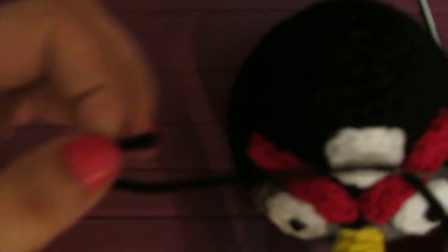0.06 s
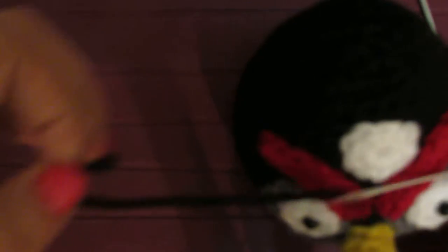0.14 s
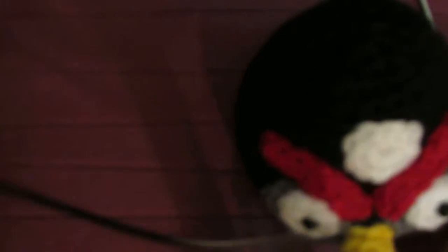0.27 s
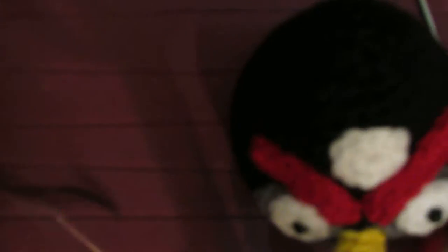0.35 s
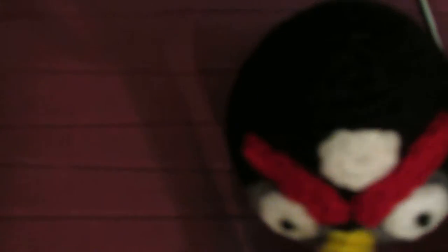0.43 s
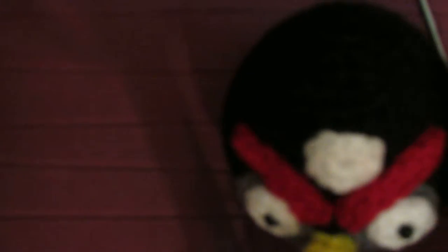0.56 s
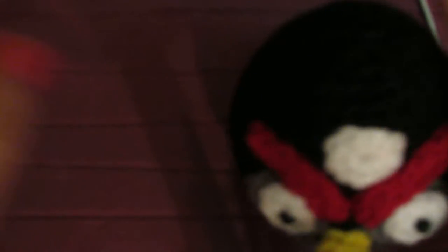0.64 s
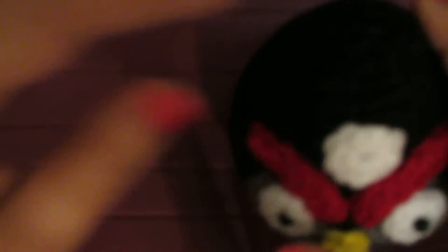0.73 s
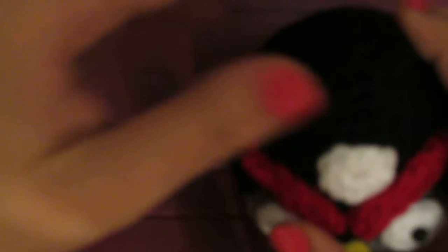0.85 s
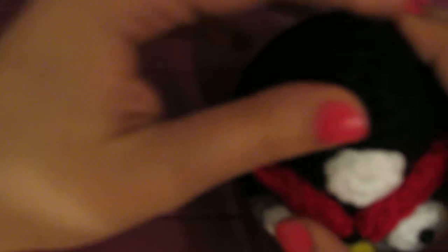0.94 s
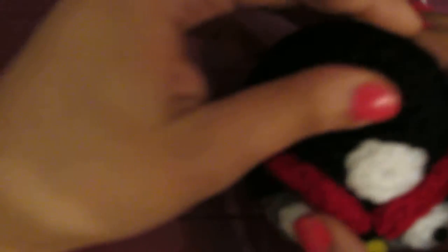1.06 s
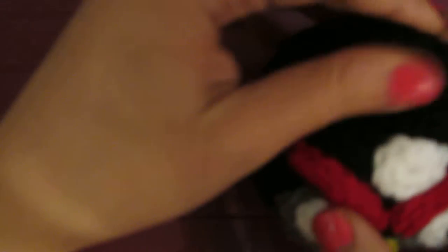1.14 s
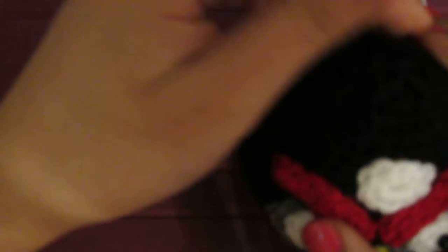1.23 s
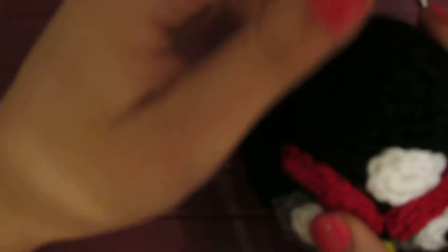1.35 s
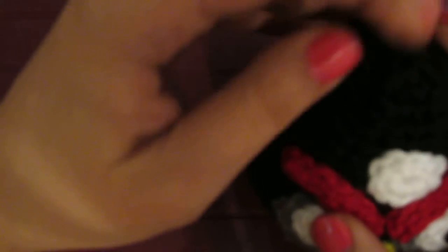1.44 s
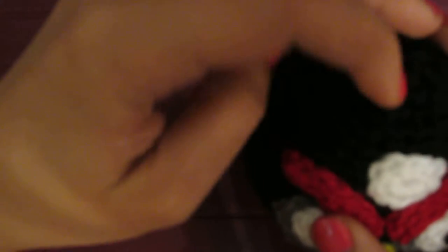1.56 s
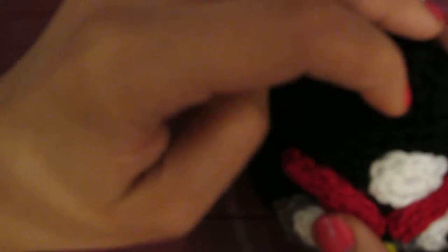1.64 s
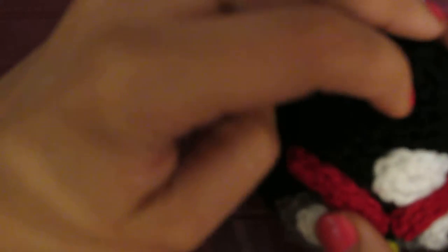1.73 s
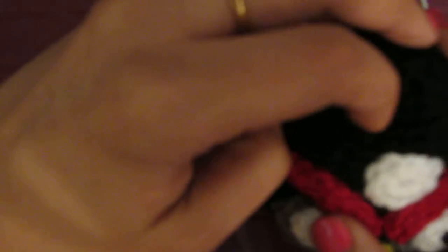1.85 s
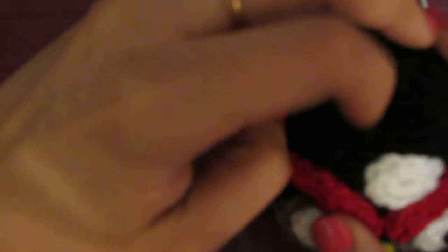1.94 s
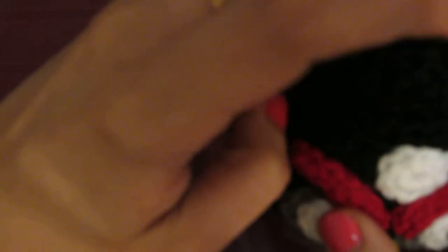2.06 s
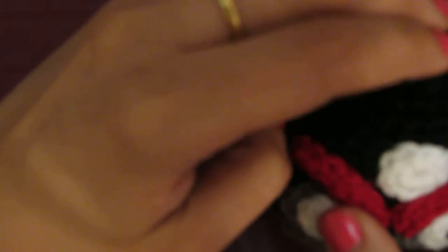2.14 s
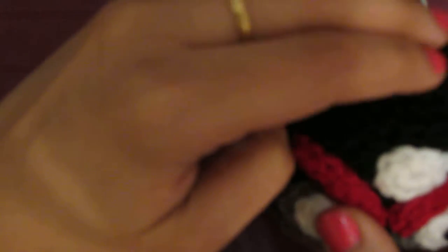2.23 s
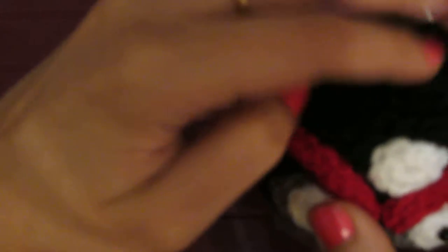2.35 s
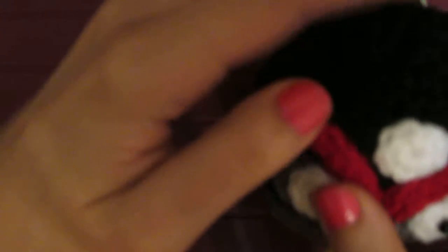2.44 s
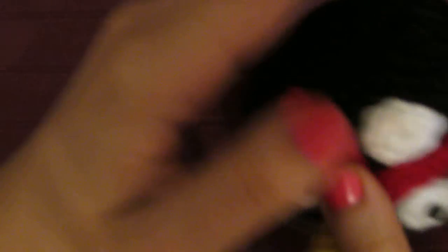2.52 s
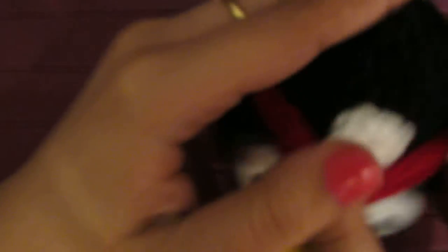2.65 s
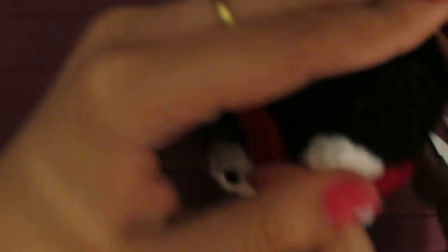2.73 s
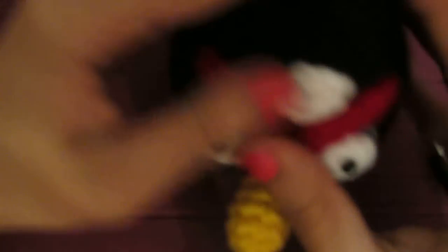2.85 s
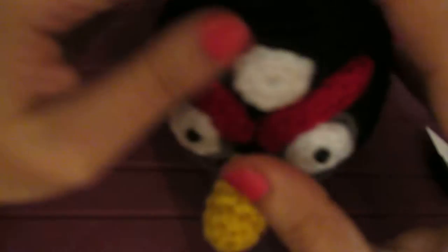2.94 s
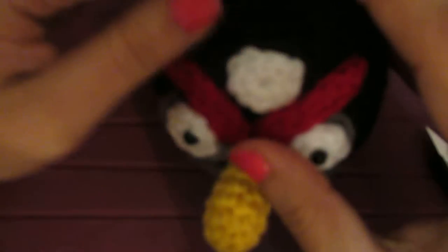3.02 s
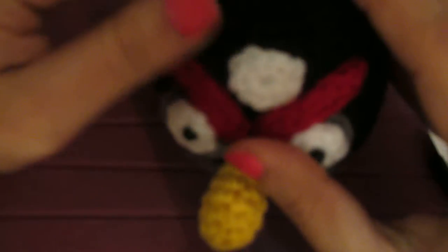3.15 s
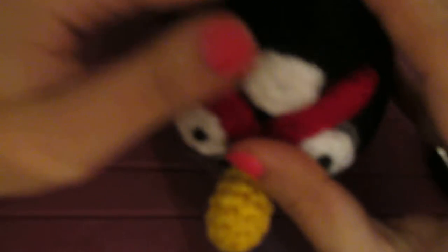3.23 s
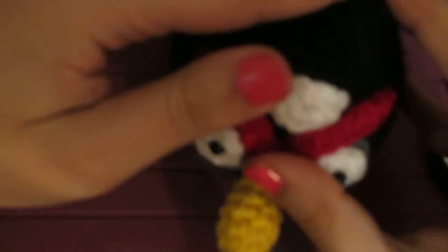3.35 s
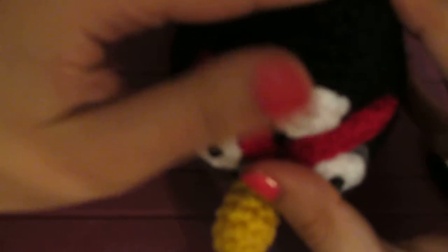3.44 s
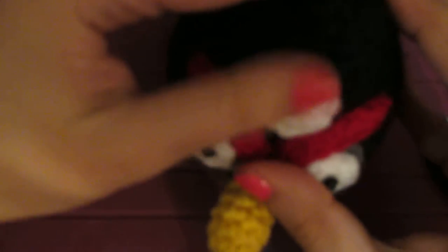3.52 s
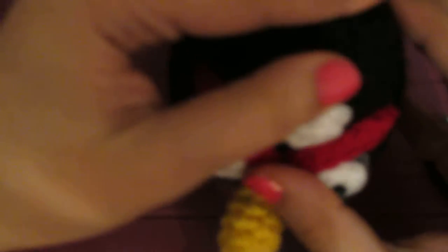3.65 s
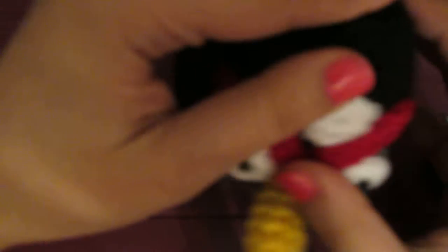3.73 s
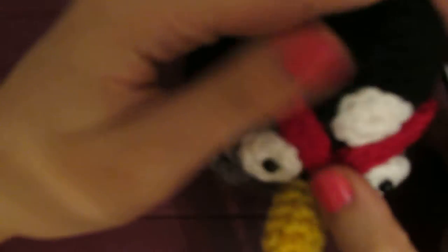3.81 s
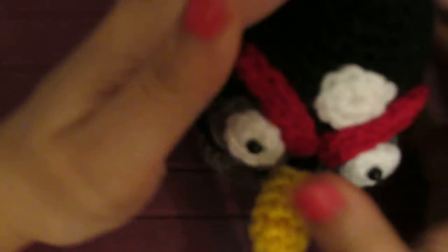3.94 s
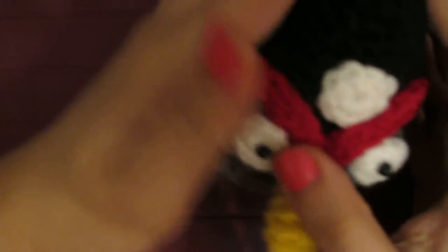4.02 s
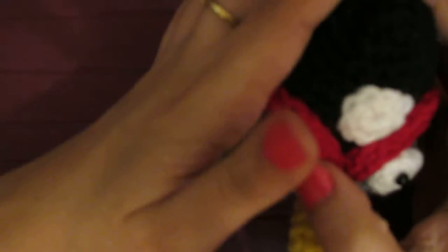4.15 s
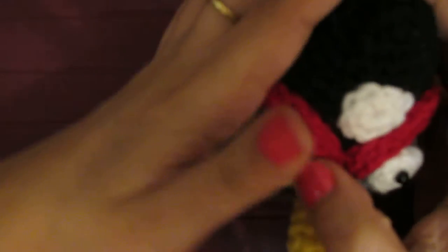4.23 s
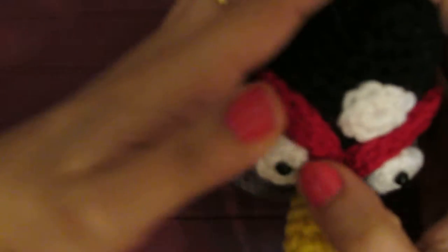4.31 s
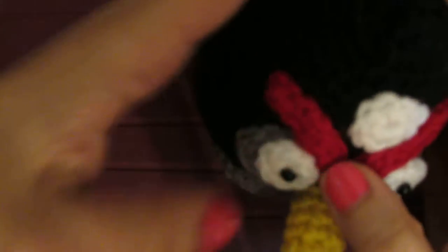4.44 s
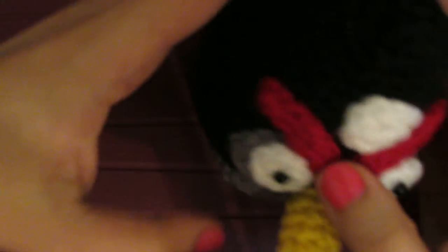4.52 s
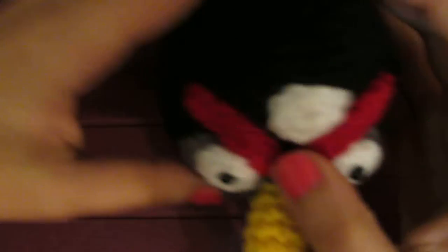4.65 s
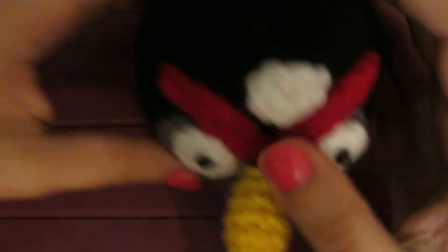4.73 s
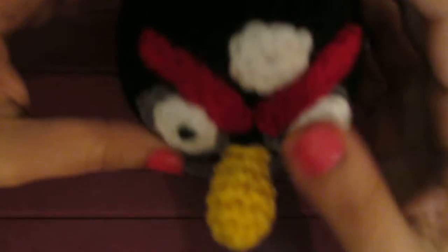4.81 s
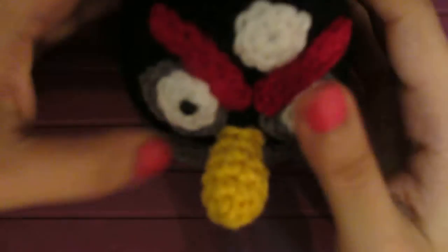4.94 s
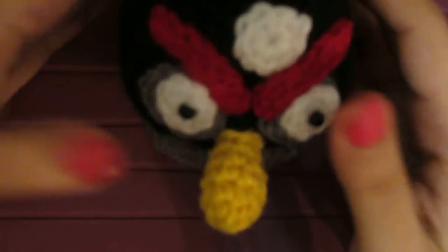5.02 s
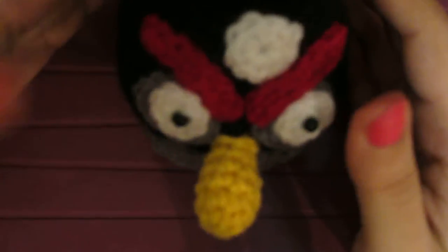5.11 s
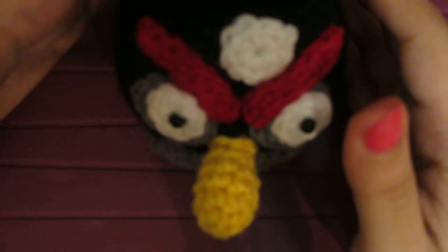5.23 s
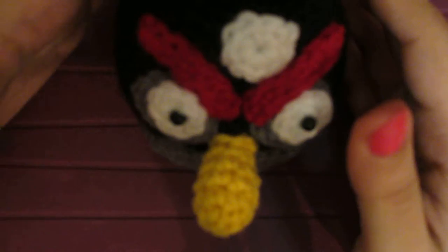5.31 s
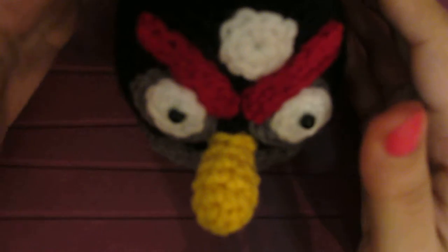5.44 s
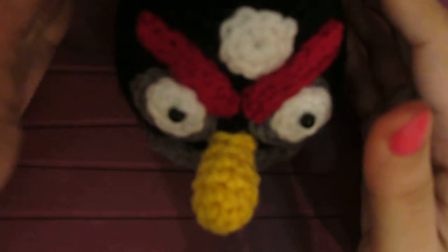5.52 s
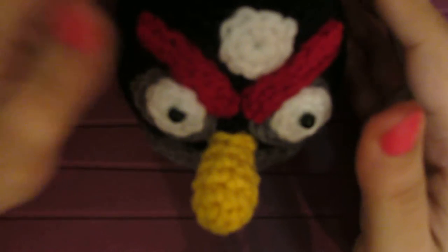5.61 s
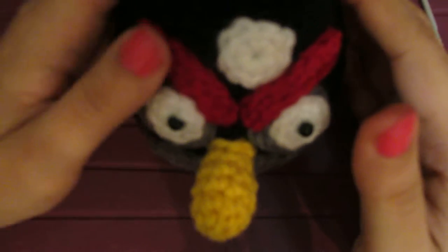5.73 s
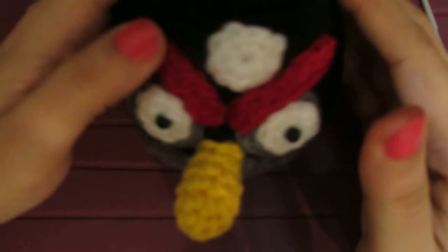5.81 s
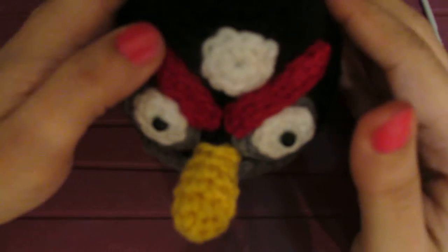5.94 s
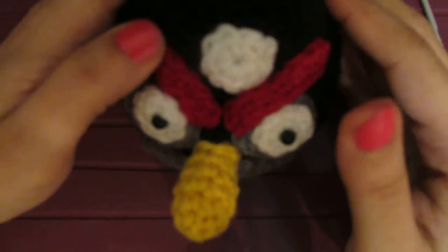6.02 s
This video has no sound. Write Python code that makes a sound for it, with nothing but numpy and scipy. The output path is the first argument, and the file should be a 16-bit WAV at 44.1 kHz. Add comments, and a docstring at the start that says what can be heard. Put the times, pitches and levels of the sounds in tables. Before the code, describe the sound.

Small steel scissors cut a strand of yarn with one sharp snip, very close to the microphone. They are set down on a table at once with several quick, light clinks, soft knocks and a brief ring. Then fingers rub and turn a crocheted toy with a faint, scratchy rustle, and a fingernail ticks once. A fan hums steadily in the small room, swelling slightly after the snip.

```python
"""Scissors and yarn in a small room

Close to a camera's stereo microphone, small steel scissors snip a strand of yarn, then are laid on
the table with a few clinks. Fingers rub and turn a crocheted toy while a fan hums in the room.
The snip drives the camera's gain control down, so the hum creeps back over two seconds."""
import sys
import numpy as np
from scipy import signal
from scipy.fft import rfft, irfft, next_fast_len
from scipy.io import wavfile
from scipy.ndimage import uniform_filter1d, map_coordinates

SR = 44100
rng = np.random.default_rng(int(sys.argv[2]) if len(sys.argv) > 2 else 0)


def store_wav(level_fs):
    """Save 16-bit WAV to argv[1]."""
    pcm = np.round(np.clip(np.atleast_2d(level_fs), -1, 1) * 32767)
    wavfile.write(sys.argv[1], SR, pcm.T.astype(np.int16))


N = 267775
TIME = np.arange(N) / SR
RING_TIME = np.arange(SR // 3) / SR


def amp(db):
    return 10 ** (np.asarray(db) / 20)


def unit_rms(x):
    return x / np.sqrt(np.mean(x ** 2) + 1e-20)


def along(points, hz):
    """Interpolate (f/Hz, value) points on a log frequency axis."""
    f, values = np.transpose(points)
    return np.interp(np.log(hz + 1), np.log(f + 1), values)


def tilted(points, slope_db, knee_hz=1200):
    """A spectrum tilted above a knee by slope_db per octave."""
    return [(hz, db + slope_db * np.log2(max(hz / knee_hz, 1))) for hz, db in points]


def favouring(rows, centre_hz, fall_db):
    """Spectrum points or modes, weakened by fall_db per octave away from a favoured frequency."""
    return [(hz, db - fall_db * abs(np.log2(hz / centre_hz)), *rest) for hz, db, *rest in rows]


def resonant(spectrum, peaks):
    """A spectrum lifted by resonances (f/Hz, width/Hz, level/dB)."""
    f = np.linspace(20, SR / 2, 2048)
    lift = sum(amp(db) ** 2 / (1 + (2 * (f - hz) / width) ** 2) ** 2 for hz, width, db in peaks)
    return np.column_stack([f, along(spectrum, f) + 10 * np.log10(1 + lift)])


def wobble(rate, size=N):
    """A smooth random curve, rate knots a second."""
    knots = rng.standard_normal(int(size * rate / SR) + 4)
    return map_coordinates(knots, [TIME[:size] * rate])


def filtered(x, response):
    """Filter x by a complex response of frequency."""
    size = next_fast_len(x.shape[-1] + 8192)
    hz = np.fft.rfftfreq(size, 1 / SR)
    return irfft(rfft(x, size) * response(hz), size)[..., :x.shape[-1]]


def struck(x, spectrum, size=2048):
    """Causal colouring: nothing sounds before the blow."""
    gain = amp(along(spectrum, np.fft.rfftfreq(size, 1 / SR)))
    cepstrum = irfft(np.log(gain))
    cepstrum[1:size // 2] *= 2
    cepstrum[size // 2 + 1:] = 0
    impulse_response = irfft(np.exp(rfft(cepstrum)))
    return signal.fftconvolve(x, impulse_response)[:len(x)]


def add(track, start_s, sound):
    """Mix a sound into a track."""
    part = track[..., max(round(start_s * SR), 0):][..., :sound.shape[-1]]
    part += sound[..., :part.shape[-1]]


def crack(spectrum, t60, push_share):
    """One sharp push and a dying rattle of micro-contacts, evened out, then given a spectrum."""
    fade = amp(-60 * RING_TIME / t60)
    rattle = unit_rms(fade * rng.standard_normal(len(fade)))
    push = unit_rms(RING_TIME == 0)
    force = np.sqrt(1 - push_share) * rattle + np.sqrt(push_share) * push
    hz = np.fft.rfftfreq(len(force), 1 / SR)
    power = uniform_filter1d(np.abs(rfft(force)) ** 2, size=100)
    uneven_db = 10 * np.log10(np.abs(power) + 1e-12)
    colour = np.column_stack([hz, along(spectrum, hz) - uneven_db])
    return unit_rms(struck(force, colour)) * np.sqrt(np.mean(fade ** 2))


def blow(spectrum, t60, push_share, scatter_db=-8):
    """A crack at both microphone ports, each with its own scatter off the hands and the table."""
    scatter = amp(scatter_db) * np.array([crack(spectrum, t60, 0) for _ in range(2)])
    return (crack(spectrum, t60, push_share) + scatter) / np.hypot(1, amp(scatter_db))


def ring(modes, scatter_db):
    """Damped modes of alternating sign, at new strengths for every blow; starts at rms 1."""
    hz, db, t60 = np.transpose(modes)[:, :, None]
    signs = (-1) ** np.arange(len(hz))[:, None]
    gain = signs * amp(db + scatter_db * rng.standard_normal(hz.shape))
    partials = gain * amp(-60 * RING_TIME / t60) * np.sin(2 * np.pi * hz * RING_TIME)
    return np.sum(partials, 0) / np.sqrt(np.sum(gain ** 2) / 2)


# likeness of the microphone's left and right ports: f/Hz, correlation
PORT_LIKENESS = [(60, 0.081), (120, 0.76), (240, 0.83), (480, 0.42), (950, 0.44), (1900, 0.044),
                 (3800, 0.3), (7500, 0.14), (15000, 0.046)]

def rush(gain, size=N):
    """Stereo noise of rms 1 shaped by gain(hz), most alike at the two ports in the upper bass."""
    def mid_side_gain(hz):
        angle = np.arccos(np.clip(along(PORT_LIKENESS, hz), 0, 1)) / 2
        return gain(hz) * np.array([np.cos(angle), np.sin(angle)])
    mid, side = filtered(rng.standard_normal((2, size)), mid_side_gain)
    return unit_rms(np.array([mid + side, mid - side]))


# the small room's decay: f/Hz, t60/s
ROOM_DECAY = [(200, 0.32), (1500, 0.27), (4000, 0.3), (8000, 0.28), (15000, 0.2)]

def in_room(x, pan_db, wet_db, lag_us=30, wall_hz=6000, build_s=0.0068):
    """A close sound reaches the right port first, then the room answers; pan_db is left over right."""
    direct = filtered(x, lambda hz: np.exp(np.outer([-1j, 1j], np.pi * hz * lag_us / 10 ** 6)))
    hz, t, noise = signal.stft(rng.standard_normal((2, SR // 3)), SR, nperseg=256)
    fade = amp(-60 * t / along(ROOM_DECAY, hz)[:, None]) * (1 - np.exp(-t / build_s))
    tail = signal.istft(noise * fade, SR)[1]
    dull_tail = filtered(tail / np.linalg.norm(tail[0]), lambda f: 1 / np.sqrt(1 + (f / wall_hz) ** 2))
    answer = signal.fftconvolve(np.atleast_2d(x), dull_tail, axes=1)[:, :x.shape[-1]]
    return direct * amp([[pan_db / 2], [-pan_db / 2]]) + amp(wet_db) * answer


# the fan's drone in the room: f/Hz, width/Hz, level/dB
FAN_DRONE = [(53, 14, -52), (105, 54, -45.5), (133.2, 8.8, -49.5), (173.8, 8.7, -55), (192.2, 17.3, -42.5),
             (220, 23, -48.5), (255.7, 38, -45.5), (314.7, 16, -55), (361.7, 11, -57), (855, 126, -51.5),
             (990, 150, -54.5)]
# spectrum of its moving air: f/Hz, level/dB
FAN_AIR = [(60, -41), (200, -28.5), (320, -4.5), (430, -5), (620, -4), (740, -8), (900, -6.5), (1060, -7),
           (1250, -9.5), (1650, -11), (2000, -13), (3300, -19.5), (4200, -24.5), (7000, -33), (11000, -38),
           (16000, -43.5)]

def fan(hum_hz=58.7, hum_db=-45.5, waver_db=0.5, air_db=-42):
    """Room tone: the motor's clean hum, turbulence in narrow resonances, and the broad rush of air."""
    def resonances(hz):
        return np.sqrt(sum(amp(db) ** 2 / width / (1 + (2 * (hz - centre) / width) ** 2) ** 2
                           for centre, width, db in FAN_DRONE))
    hum_peak = np.sqrt(2) * amp(hum_db + waver_db * wobble(3.3))
    hum = hum_peak * np.sin(2 * np.pi * hum_hz * TIME + 0.11 * wobble(2.5))
    drone = np.linalg.norm([amp(db) for _, _, db in FAN_DRONE]) * rush(resonances)
    air = amp(air_db) * rush(lambda hz: amp(along(FAN_AIR, hz)))
    return hum * amp([[1.6], [-1.6]]) + drone + air


def fibres(spectrum, size, grain_db=2.0):
    """Skin dragging over fibres: a grainy hiss of rms 1."""
    hiss = rush(lambda hz: amp(along(spectrum, hz)), size)
    return unit_rms(hiss * amp(grain_db * wobble(350, size)))


# spectrum of rubbed wool: f/Hz, level/dB
WOOL_TONE = [(800, -27), (2500, 4.5), (5000, -0.5), (7500, -3), (10000, -5.5), (15500, -8)]
# the hands turn the toy: from t/s, to t/s
TURN_SPAN = (2.17, 4.9)
# a finger strokes or catches a fibre: t/s, level/dB, half length/s, favoured f/Hz, fall/(dB/octave)
FINGER_STROKES = [(0.016, -56.5, 0.027, 11000, 9), (1.1, -58.5, 0.16, 10000, 4),
                  (1.203, -44, 0.022, 10500, 6.5), (1.831, -54, 0.013, 10000, 5),
                  (1.892, -43, 0.002, 8500, 12), (1.954, -59, 0.037, 10000, 8),
                  (2.358, -52, .006, 10000, 8), (2.417, -55, .008, 11500, 10),
                  (2.572, -51.5, 0.025, 7000, 4), (2.651, -55, 0.045, 6200, 10),
                  (2.692, -47.5, 0.041, 7200, 9), (2.737, -46.5, 0.019, 5200, 4),
                  (2.77, -55, 0.019, 11000, 9), (2.86, -55, 0.055, 8000, 7), (2.963, -54, .015, 11000, 5),
                  (3.043, -55, .065, 12000, 7), (3.09, -57, 0.12, 5300, 5), (3.267, -57, 0.017, 10500, 14),
                  (3.325, -59, 0.04, 11000, 9), (3.798, -59, 0.15, 10000, 9), (4.121, -58, 0.074, 6500, 8),
                  (4.362, -59, 0.032, 10000, 11), (4.626, -53.5, 0.052, 7300, 13),
                  (4.97, -53.5, 0.072, 9000, 5), (4.984, -53, .003, 10000, 9), (5.024, -52, .003, 10000, 5),
                  (5.827, -58.5, 0.053, 8000, 4), (5.981, -55, 0.049, 6000, 4)]

def wool(hold_db=-70.5, turn_db=-60.5, ease_s=0.12, unsteady_db=1.56):
    """The toy rustles under an unsteady grip, more while turned; each stroke swells and fades on top."""
    start, end = TURN_SPAN
    turning = (np.tanh((TIME - start) / ease_s) - np.tanh((TIME - end) / ease_s)) / 2
    out = amp(hold_db + (turn_db - hold_db) * turning) * fibres(WOOL_TONE, N)
    t = TIME[:SR // 2] - np.mean(TIME[:SR // 2])
    for peak_s, db, half_s, favoured_hz, fall_db in FINGER_STROKES:
        swell = amp(db) * np.exp(-(t / half_s) ** 2)
        stroke = swell * fibres(favouring(WOOL_TONE, favoured_hz, fall_db), len(t))
        add(out, peak_s + t[0], stroke[:, peak_s + t >= 0])
    return out * amp(unsteady_db * wobble(24.77))


# spectrum of a light steel contact: f/Hz, level/dB
CONTACT_TONE = [(200, -11), (1000, -15), (1700, -8.5), (2400, -5.5), (3100, -5.5), (4700, -2), (5700, -3.5),
                (6400, -5), (7800, -1.5), (9200, -5.5), (10700, -3), (12000, -1), (15200, 2)]
# modes of the loose blades: f/Hz, level/dB, t60/s
BLADE_MODES = [(2880, -2, 0.1), (3420, -9, .08), (4080, -7, .07), (4590, -5, 0.12), (4960, -1, .1),
               (6635, 8, 0.022), (7600, -8, .05), (8045, -5, 0.07), (8170, 5.5, 0.025), (8690, -2, .03),
               (9500, -6, .07), (10340, -3, 0.085), (10550, 0, .025), (11340, 2.5, 0.075), (12340, -2, .08),
               (14160, -7, .08), (15070, -9, .05)]
# contacts near the microphone, before the cut and as the scissors are laid down:
# t/s, level/dB, t60/s, tilt/(dB/octave), relative ring/dB, favoured f/Hz, shank f/Hz, pan/dB
STEEL_CONTACTS = [(0.0687, -7.5, 0.011, 1, -28, 12200, 4300, -4),
                  (0.072, -18, 0.013, 8, -14, 7800, 5000, 4), (0.076, -23, 0.023, 0, -18, 12000, 5000, -6),
                  (0.3209, -6, 0.022, -1.5, -20, 8200, 2870, -4),
                  (0.326, -4.5, 0.01, -5, -3.5, 6600, 4200, -5),
                  (0.3284, -8, 0.016, -4.5, -9, 8200, 4940, -11),
                  (0.3302, -8, 0.013, -3.5, 0, 11300, 5030, -2),
                  (0.396, -16.5, 0.0087, -4, -29, 3700, 2950, -1),
                  (0.4293, -18.5, 0.018, -4, -25, 12250, 4850, -4),
                  (0.4709, -15, 0.003, -6, -30, 4400, 3900, 6),
                  (.4975, -24, 0.0045, 1, -28, 11000, 4600, 2),
                  (0.5175, -14.5, 0.012, -3.5, -27, 11900, 4900, -5),
                  (0.5318, -8.5, 0.017, 1.5, -28, 10600, 6150, 2),
                  (0.538, -6.5, 0.01, 0.5, -28, 10800, 4600, 3)]

def clinks():
    """The scissors tick and settle; each point of contact favours some modes and bends the shanks."""
    out = np.zeros((2, N))
    blade_peaks = [(hz, 330, 2) for hz, _, _ in BLADE_MODES]
    for start_s, db, t60, tilt_db, ring_db, favoured_hz, shank_hz, pan_db in STEEL_CONTACTS:
        colour = favouring(tilted(CONTACT_TONE, tilt_db), favoured_hz, fall_db=3.0)
        colour = resonant(colour, blade_peaks)
        # the resonance nearest the contact, and the shanks, whose pitch depends on their support
        colour = resonant(colour, [(favoured_hz, 910, 7.5), (shank_hz, 720, 8.5)])
        tick = blow(colour, t60, push_share=0.1)
        blades = amp(ring_db) * ring(favouring(BLADE_MODES, favoured_hz, fall_db=15.5), scatter_db=2.5)
        add(out, start_s, in_room(amp(db) * tick, pan_db, wet_db=-12, wall_hz=14000))
        add(out, start_s, in_room(amp(db) * blades, pan_db, wet_db=-13, wall_hz=14000))
    return out


# spectrum of the blades' snap: f/Hz, level/dB
SNAP_TONE = [(90, -4), (300, -7.5), (430, -2), (900, 1.5), (1350, 5.5), (2000, 0), (2700, 3), (3800, 2),
             (4900, -1), (5800, -5), (7500, -10), (11500, -8), (15500, -15)]
# modes of the closed blades, damped by the hand: f/Hz, level/dB, t60/s
HELD_MODES = [(476, -10.5, 0.042), (656, -19, 0.044), (1035, -3.5, 0.012), (1560, -4.5, 0.012),
              (2950, -4.5, 0.012), (3900, 4.5, 0.0075), (4850, 4, 0.0057)]
# the blades shut close to the microphone: t/s, level/dB, t60/s, tilt/(dB/octave)
SNIP_BLOWS = [(0.1486, 13, 0.0093, 1.5), (0.1522, -5, 0.02, 0), (0.1635, -9.5, 0.02, -0.5)]

def snip(ring_db=-1.5, bounce_s=0.001745, bounce_db=-8, bounce_hz=6000):
    """The blades break through the yarn and slam shut; the sound comes back duller off the table."""
    out = np.zeros((2, N))
    for start_s, db, t60, tilt_db in SNIP_BLOWS:
        snap = amp(db) * blow(tilted(SNAP_TONE, tilt_db), t60, push_share=0.16)
        blades = amp(db + ring_db) * ring(HELD_MODES, scatter_db=2.5)
        bounce = amp(bounce_db) * filtered(snap + blades, lambda hz: 1 / (1 + (hz / bounce_hz) ** 4))
        add(out, start_s, in_room(snap, pan_db=-7.5, wet_db=-10.5, lag_us=29, wall_hz=5500))
        add(out, start_s, in_room(blades, pan_db=-5.5, wet_db=-18, lag_us=25, wall_hz=5500))
        add(out, start_s + bounce_s, bounce)
    return out


# spectrum of the tabletop: f/Hz, level/dB
TABLETOP_TONE = [(60, -15), (170, 6), (330, -6), (600, 2), (900, -3), (1800, -12), (3000, -24),
                 (15000, -45)]
# the handles bump it, close and near centre: t/s, level/dB, t60/s
HANDLE_BUMPS = [(0.326, -29, 0.052), (0.3966, -25, 0.02)]

def table_knocks():
    """The table answers the handles with a soft, dull knock."""
    out = np.zeros((2, N))
    for start_s, db, t60 in HANDLE_BUMPS:
        knock = amp(db) * blow(TABLETOP_TONE, t60, push_share=0.37)
        add(out, start_s, in_room(knock, pan_db=-1.5, wet_db=-11))
    return out


# modes of the scissors lying free: f/Hz, level/dB, t60/s
FREE_MODES = [(4740, 0, 0.2), (4500, 1, .1), (9146, -10, .11), (11040, -6, .11)]
# the hand lets go: t/s, level/dB
RELEASE = (0.538, -38)

def last_ring():
    """With no hand to damp them, the blades sing on briefly after the last contact."""
    out = np.zeros((2, N))
    start_s, db = RELEASE
    add(out, start_s, in_room(amp(db) * ring(FREE_MODES, scatter_db=1.0), pan_db=0, wet_db=-18))
    return out


# spectrum of a fingernail's tick: f/Hz, level/dB
TICK_TONE = [(1000, -18), (2850, -2), (3300, -13), (4200, -1), (4550, -6), (5000, 6), (5900, -13),
             (15000, -26)]
# the tick, close and to the microphone's right: t/s, level/dB, t60/s
NAIL_TICK = (4.001, -40.5, 0.029)

def fingernail():
    """A fingernail catches once, with a small dry tick."""
    out = np.zeros((2, N))
    start_s, db, t60 = NAIL_TICK
    tick = amp(db) * blow(TICK_TONE, t60, push_share=0.1)
    add(out, start_s, in_room(tick, pan_db=-10, wet_db=-12))
    return out


def scene():
    """The close handwork and the fan behind it, as they reach the microphone."""
    return fan() + wool() + clinks() + snip() + table_knocks() + last_ring() + fingernail()


def gain_control(x, limit_db=-12.3, start_db=-9, climb_per_s=0.44, window=441):
    """Loud sound turns the gain down at once; it starts low and climbs steadily back to 1."""
    power = uniform_filter1d(np.mean(x ** 2, 0), window)
    level = np.sqrt(np.abs(power) + 1e-12)
    allowed = np.minimum(amp(limit_db) / level, 1)
    climb = climb_per_s * TIME
    gain = np.minimum.accumulate(np.minimum(allowed - climb, amp(start_db))) + climb
    return x * gain


def record(dry):
    """The camera: gain control, full-scale clipping and a steep band limit at 16 kHz."""
    clipped = np.clip(gain_control(dry), -1, 1)
    return filtered(clipped, lambda hz: 1 / (1 + (hz / 16000) ** 120))


dry = scene()
out = record(dry)
store_wav(out)
```